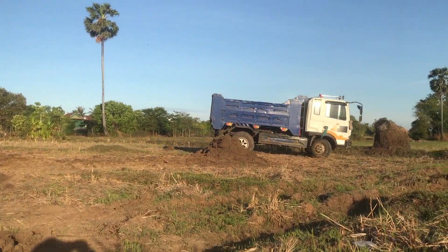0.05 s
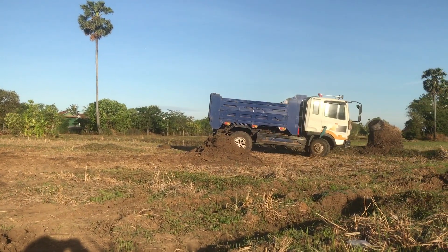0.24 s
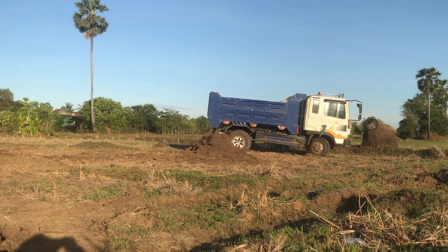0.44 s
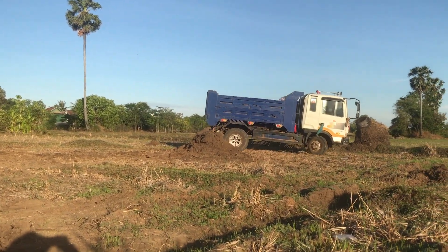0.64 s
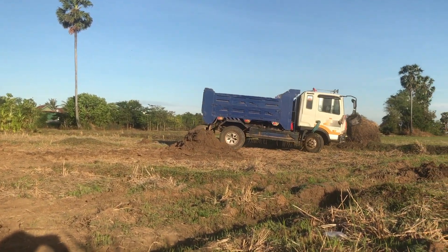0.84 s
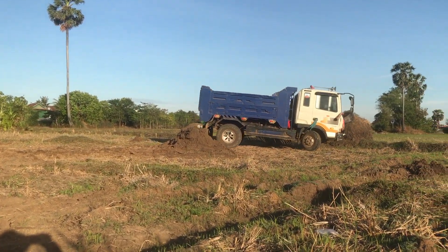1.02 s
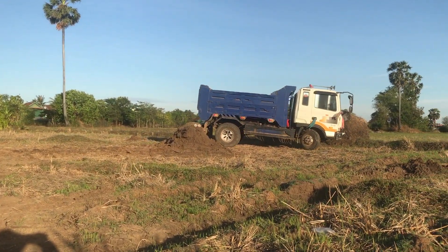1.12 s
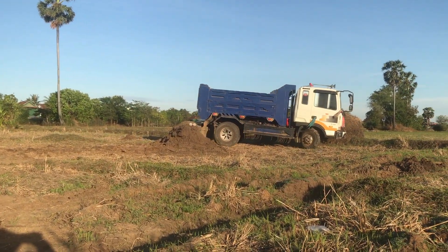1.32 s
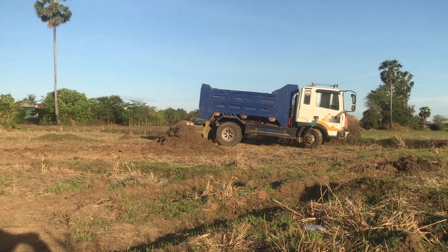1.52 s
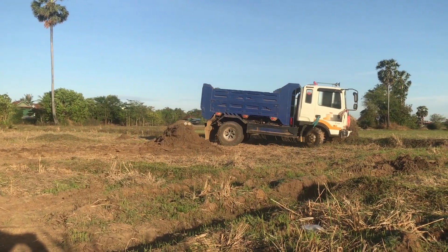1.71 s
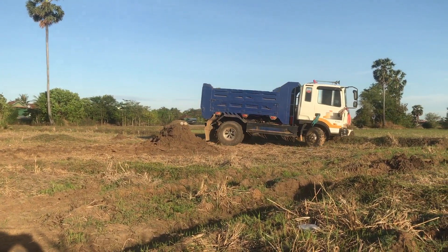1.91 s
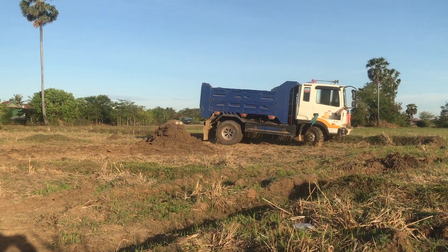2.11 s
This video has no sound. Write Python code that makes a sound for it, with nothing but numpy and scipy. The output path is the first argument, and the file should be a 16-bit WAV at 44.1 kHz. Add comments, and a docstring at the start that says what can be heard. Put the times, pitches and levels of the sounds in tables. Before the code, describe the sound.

A dump truck's steel tailgate slams shut at about 0.2 seconds, some way off in an open field, with a sharp crack, a hollow boom and quick rebounds until 0.4 seconds. Smaller irregular thuds and clanks from the body follow until about 2 seconds, clearest near 0.6, 0.9 and 1.9. The diesel engine rumbles and clatters steadily throughout, with light wind on the microphone and a very faint dry rustle.

```python
"""An open field, light wind, dry stubble crackling. Some way off, a dump truck pulls away from a soil heap.
Its steel tailgate swings shut: the latch cracks, the plates clash, the empty bed booms, and a few
rebounds follow. The diesel rumbles throughout, its firings driving low exhaust tones and a clatter.
The body knocks over the rough ground and rubbing metal squeaks thinly.
Ground and trees scatter a dull tail back from every blow."""
import sys
import numpy as np
from scipy import signal
from scipy.fft import rfft, irfft
from scipy.io import wavfile

SR = 44100
rng = np.random.default_rng(int(sys.argv[2]) if len(sys.argv) > 2 else 0)


def unload_wav(signal):
    """Save mono or channel-first audio to the path in sys.argv[1] as 16-bit WAV at rate SR, clipped to [-1, 1]."""
    wavfile.write(
        sys.argv[1],
        SR,
        np.round(np.clip(np.atleast_2d(signal).T, -1, 1) * 32767).astype(np.int16),
    )


N = 94815
T = np.arange(N) / SR

# colour of the wind's rumble (frequency [Hz], relative density [dB])
RUMBLE_SPECTRUM = [(15, -37), (30, -23), (45, 6), (70, 2), (100, -5.5), (130, -2), (200, -10.5), (300, -26),
                   (1000, -57)]
# gusts of rumble on the microphone (time [s], level [dB])
RUMBLE_LEVEL = [(0, -49.5), (.11, -45.5), (.18, -53), (.3, -43), (.385, -41), (.47, -44.5), (.9, -42.5),
                (.98, -45), (1.15, -40), (1.25, -47), (1.34, -38), (1.43, -43.5), (1.56, -49),
                (1.69, -42.5), (1.85, -45), (2.15, -49)]
# colour of the faint hiss (frequency [Hz], relative density [dB])
HISS_SPECTRUM = [(1500, -11), (3200, 6.5), (4400, 5), (6300, -3), (8000, -13.5), (10400, -10), (12500, -18),
                 (15500, -25)]
# swells of the hiss (time [s], level [dB])
HISS_LEVEL = [(0, -59), (.1, -60), (.18, -68), (.49, -67), (.55, -59), (.62, -66), (.76, -72), (.88, -66),
              (1.05, -68), (1.28, -63), (1.4, -74), (1.73, -59), (1.79, -64), (1.85, -74), (1.9, -59),
              (1.99, -66), (2.07, -67)]
# colour of snapping stalks (frequency [Hz], relative density [dB])
STUBBLE_SPECTRUM = [(2000, -11), (5000, -7), (6500, -10.5), (9300, 0.5), (10400, -10), (12500, -2),
                    (15500, -7)]
# swells of the stubble's crackle (time [s], level [dB])
STUBBLE_LEVEL = [(0, -71.5), (.7, -74.5), (1.03, -72.5), (1.22, -65.5), (1.38, -74), (1.5, -69.5),
                 (1.62, -76), (2.15, -72.5)]

# thin metal squeaks (time [s], length [s], start pitch [Hz], end pitch [Hz], level [dB])
SQUEAKS = [(1.278, .035, 11800, 11950, -70), (1.32, 0.047, 12050, 12100, -73),
           (1.765, .05, 11900, 11750, -70), (1.792, .04, 11800, 12000, -67),
           (1.935, 0.14, 12300, 12200, -65.5)]
# the diesel's pace and loudness (time [s], firing rate [Hz], gain [dB])
ENGINE_CURVE = [(0, 48.8, 1), (.5, 46, 0.5), (.9, 47, 0.5), (1.1, 48, 0), (1.35, 49, 0.6), (1.6, 47, -1.75),
                (1.95, 49, -.3), (2.15, 48, -2)]
# exhaust tones (harmonic [x firing rate], level [dB])
EXHAUST_HARMONICS = [(1, -48), (2, -47), (3, -58.5), (4, -60.5), (5, -64)]
# colour of the diesel clatter (frequency [Hz], relative density [dB])
CLATTER_SPECTRUM = [(120, -26), (200, -2.5), (352, -17.5), (446, -11.5), (728, -13.5), (1280, -13),
                    (2020, -20), (2170, -18.5), (2380, -21.5), (3360, -26.5), (4840, -32.5), (6130, -31.5),
                    (10400, -49.5), (12200, -44), (15500, -64)]

# knocks of the body on rough ground (time [s], pitch [Hz], thud level [dB], clank level [dB])
BODY_KNOCKS = [(0.086, 144, -30.5, -51), (0.126, 192, -38.5, -61), (.378, 61.6, -25.5, -58),
               (.476, 152, -31, -44), (0.541, 207, -41, -40.5), (0.584, 79, -33, -60), (.609, 92, -34, -50),
               (0.623, 155, -34, -54), (0.718, 189, -32.5, -61), (.765, 98, -31.5, -60),
               (0.813, 132, -32.5, -42), (0.865, 153, -43, -52), (.885, 167, -37, -46),
               (0.926, 84, -33, -40), (1.039, 129.5, -39.5, -46), (1.078, 173, -38, -60),
               (1.155, 80, -33.5, -51), (1.32, 171.5, -30.5, -63), (1.372, 85, -33.5, -67),
               (1.459, 203.8, -34, -56), (1.616, 192, -39, -66), (1.691, 93, -39.5, -43.5),
               (1.852, 207, -39.5, -56), (1.883, 129, -30.5, -48), (1.893, 215, -35.5, -56),
               (1.956, 254, -36, -58), (1.978, 262, -39.5, -56), (2.023, 144, -38, -57)]
# modes of a body thud (frequency [x pitch], level [dB], t60 [s])
THUD_MODES = [(.62, -4.5, 0.044), (1, 4.5, 0.066), (1.37, -5, 0.065), (1.95, -8.5, .07)]
# colour of a clank (frequency [Hz], relative density [dB])
CLANK_SPECTRUM = [(150, 9), (450, 1), (650, 8), (900, -12), (2000, -10), (5000, -26.5), (15000, -53)]
# short clacks of loose fittings (time [s], pitch [Hz], level [dB])
FITTING_CLACKS = [(0.594, 645, -32), (0.6227, 594, -37), (.936, 480, -30.5), (1.888, 396, -35.5)]
# modes of a clack (frequency [x pitch], level [dB], t60 [s])
CLACK_MODES = [(.75, -10, 0.019), (1, -0.5, 0.023), (1.4, -5.5, 0.019), (2.1, -3, 0.011)]

# the tailgate's slam and rebounds (time [s], boom level [dB], clash level [dB])
GATE_BLOWS = [(0.2245, -24.5, -33), (0.228, -23.5, -36), (0.2335, -11.7, -31.5), (0.2404, -22, -32.5),
              (0.2479, -22.5, -41.5), (0.2835, -27, -39.5), (0.2999, -25, -40), (0.318, -25.1, -36.5),
              (.334, -20, -43), (0.3821, -35, -43)]
# modes of the empty bed and the gate (frequency [Hz], level [dB], t60 [s])
BED_MODES = [(49.4, -24, .7), (111.9, -10.7, .3), (123.2, -8, .28), (143.8, -6.4, .14), (155.3, -1.8, .19),
             (178.4, -12.4, .22), (202.4, -9.3, .2), (235.4, -15, .28), (302.8, -21.5, .27),
             (485, -21, .48), (548.4, -29, .35), (609.8, -28.5, .35), (715.6, -21.5, .28), (980, -34, .35),
             (1130, -32, .35), (1238, -34, .3), (1513, -35, .3), (1696, -36, .27), (1914, -34, .25),
             (3160, -40, .25), (4270, -44, .3)]
# colour of the steel plates' dense modes (frequency [Hz], relative density [dB])
CLASH_SPECTRUM = [(100, -24), (300, 6), (680, 3.5), (860, -3), (1300, 1.5), (2000, -2.5), (2750, -4),
                  (3200, -3), (4300, -9), (4900, -15), (6200, -12.5), (8000, -21), (11000, -24.5),
                  (15500, -32)]
# ring-out of the plates (frequency [Hz], t60 [s])
CLASH_DECAY = [(200, 0.28), (700, 0.31), (2000, 0.23), (4000, 0.17), (8000, 0.14), (15000, 0.093)]
# cracks of the latch (time [s], level [dB])
LATCH_CRACKS = [(.2238, -24), (.2293, -19)]
# modes of the latch (frequency [Hz], level [dB], t60 [s])
LATCH_MODES = [(1946, -6, 0.02), (2390, -6, 0.011), (3370, -9, 0.017), (4100, -17, 0.023),
               (6766, -18.5, 0.031)]
# thin after-ring of the latch (time [s], frequency [Hz], level [dB], t60 [s])
LATCH_RING = [(0.271, 11000, -67, 1.1)]

ATTACK_S = 0.0021  # shared by the booms, the thuds and the latch's after-ring


def amp(db):
    """Decibels to gain."""
    return 10 ** (np.asarray(db) / 20)


def unit(x):
    """Scales to rms 1."""
    return x / np.sqrt(np.mean(x ** 2) + 1e-20)


def over_hz(points, hz):
    """Reads a table on a log-frequency axis."""
    f, value = np.transpose(points)
    return np.interp(np.log(hz + 1), np.log(f + 1), value)


def over_time(points, column=1):
    """Reads one column of a curve at every sample."""
    table = np.transpose(points)
    return np.interp(T, table[0], table[column])


def add(mix, s, sound):
    """Mixes a sound in at s seconds."""
    part = mix[max(round(s * SR), 0):][:len(sound)]
    part += sound[:len(part)]


def coloured(x, spectrum):
    """Shapes x with an EQ curve, at rms 1."""
    gain = amp(over_hz(spectrum, np.fft.rfftfreq(N, 1 / SR)))
    return unit(irfft(rfft(x) * gain, N))


def noise(spectrum):
    """Coloured noise of rms 1."""
    return coloured(rng.standard_normal(N), spectrum)


def drift(rate_hz):
    """A smooth random modulator of rms 1, rolling off above rate_hz."""
    hz = np.fft.rfftfreq(N, 1 / SR)
    lowpass = (hz > 0) * np.exp(-(hz / rate_hz) ** 2)
    return unit(irfft(rfft(rng.standard_normal(N)) * lowpass, N))


def decay(t, t60):
    """An exponential fade, 60 dB down after t60 seconds."""
    return np.exp(-np.log(1000) * t / t60)


def strike(attack_s, t60):
    """Envelope of a blow: quick attack, exponential decay."""
    return (1 - np.exp(-T / attack_s)) * decay(T, t60)


def ring(modes, attack_s, pitch=1):
    """A struck object: a sum of dying sines, their frequencies multiplied by pitch."""
    t = T[:SR * 3 // 4]
    partials = sum(amp(db) * decay(t, t60) * np.sin(2 * np.pi * f * pitch * t) for f, db, t60 in modes)
    return (np.exp(-t / attack_s) - 1) * partials


def wind(lumpy_db=2):
    """Wind buffets the microphone with a lumpy rumble; a faint hiss comes and goes."""
    rumble = noise(RUMBLE_SPECTRUM) * amp(over_time(RUMBLE_LEVEL) + lumpy_db * drift(42))
    hiss = noise(HISS_SPECTRUM) * amp(over_time(HISS_LEVEL))
    return rumble + hiss


def stubble(snaps_per_s=4200, spread_db=2.5):
    """Dry stalks rustle in many tiny snaps, a few louder than the rest."""
    snaps = (rng.random(N) < snaps_per_s / SR) * rng.choice([-1, 1], N)
    strength = amp(spread_db * np.minimum(rng.exponential(1, N), 5))
    return amp(over_time(STUBBLE_LEVEL)) * coloured(snaps * strength, STUBBLE_SPECTRUM)


def field_scatter(sound, send_db=-13.5, band_hz=(260, 2480)):
    """Ground and trees scatter back a faint, dull reverb tail."""
    tail = rng.standard_normal(N) * strike(attack_s=0.017, t60=0.86)
    band = signal.butter(2, band_hz, "band", fs=SR, output="sos")
    dull_tail = signal.sosfilt(band, tail / np.linalg.norm(tail))
    return signal.fftconvolve(amp(send_db) * sound, dull_tail)[:N]


def squeaks(waver_hz=45, flutter_db=3):
    """Rubbing metal sings briefly on a very high, wavering note."""
    out = np.zeros(N)
    for s, length, start_hz, end_hz, db in SQUEAKS:
        progress = np.linspace(0, 1, round(length * SR))
        hz = start_hz + (end_hz - start_hz) * progress + waver_hz * drift(120)[:len(progress)]
        swell = amp(db) * np.sin(np.pi * progress)
        add(out, s, swell * np.sin(2 * np.pi * np.cumsum(hz) / SR))
    return out * amp(flutter_db * drift(60))


def engine(wander=0.0302, uneven_db=2, clatter_db=-47.5, flicker_db=0.63, beat_depth=0.33):
    """Uneven firings drive low exhaust tones and a pulsing diesel clatter."""
    firing_hz = over_time(ENGINE_CURVE) * (1 + wander * drift(12))
    firings = np.cumsum(firing_hz) / SR
    exhaust = np.zeros(N)
    for harmonic, db in EXHAUST_HARMONICS:
        gain = amp(db + uneven_db * drift(10))
        exhaust += gain * np.sin(2 * np.pi * (harmonic * firings + rng.random()))
    beat = unit(1 + beat_depth * np.exp(-(firings % 1) / 0.1))  # each accent lasts a tenth of a cycle
    low_cut = signal.butter(3, 150, "high", fs=SR, output="sos")
    clatter = beat * signal.sosfilt(low_cut, noise(CLATTER_SPECTRUM))
    clatter *= amp(clatter_db + flicker_db * drift(60))
    return amp(over_time(ENGINE_CURVE, column=2)) * (exhaust + clatter)


def body_knocks():
    """The body thuds and its loose fittings clank and clack as the wheels cross ruts."""
    tones, clank_envelope = np.zeros((2, N))
    hit = strike(attack_s=0.0032, t60=0.11)
    for s, hz, thud_db, clank_db in BODY_KNOCKS:
        add(tones, s, amp(thud_db) * ring(THUD_MODES, ATTACK_S, pitch=hz))
        add(clank_envelope, s, amp(clank_db) * hit)
    for s, hz, db in FITTING_CLACKS:
        add(tones, s, amp(db) * ring(CLACK_MODES, attack_s=0.00044, pitch=hz))
    return tones + clank_envelope * noise(CLANK_SPECTRUM)


def latch():
    """The struck latch cracks sharply and leaves a thin, high ring."""
    out = np.zeros(N)
    for s, db in LATCH_CRACKS:
        add(out, s, amp(db) * ring(LATCH_MODES, attack_s=0.0002))
    for s, *mode in LATCH_RING:
        add(out, s, ring([mode], ATTACK_S))
    return out


def plate_clash(attack_s=0.001):
    """Countless steel plate modes start together; the high ones die first."""
    hz, t, bands = signal.stft(noise(CLASH_SPECTRUM)[:SR // 2], SR, nperseg=256)
    bands *= decay(t, over_hz(CLASH_DECAY, hz)[:, None])
    _, plates = signal.istft(bands, SR, nperseg=256)
    return plates * (1 - np.exp(-T[:len(plates)] / attack_s))


def tailgate(chatter_db=0.5, chatter_hz=250):
    """Each blow of the gate booms the empty bed and sets the loose plates chattering."""
    boom = ring(BED_MODES, ATTACK_S)
    booms, plates = np.zeros((2, N))
    for s, boom_db, clash_db in GATE_BLOWS:
        add(booms, s, amp(boom_db) * boom)
        add(plates, s, amp(clash_db) * plate_clash())
    return booms + plates * amp(-chatter_db * drift(chatter_hz))


def scene():
    """The truck, the wind and the dry field in mono; only the impacts feed the reverb."""
    impacts = tailgate() + latch() + body_knocks()
    return (impacts + field_scatter(impacts) + engine() + wind() + stubble() + squeaks())[None]


def record(dry, low_cut_hz=32.7, high_cut_hz=15720):
    """A low cut trims the deepest rumble and a steep high cut takes off the very top."""
    low_cut = signal.butter(4, low_cut_hz, "high", fs=SR, output="sos")
    high_cut = signal.firwin(1023, high_cut_hz, window=("kaiser", 9), fs=SR)
    return signal.oaconvolve(signal.sosfilt(low_cut, dry), high_cut[None], "same")


dry = scene()
out = record(dry)
unload_wav(out)
```